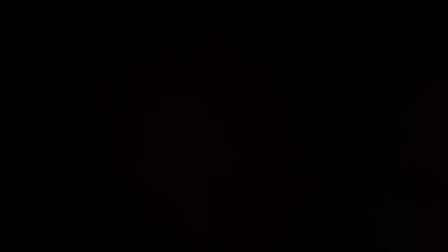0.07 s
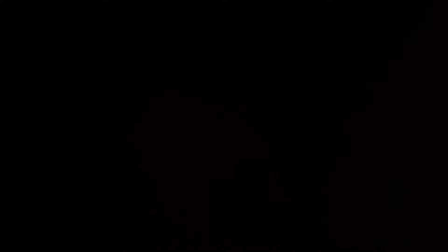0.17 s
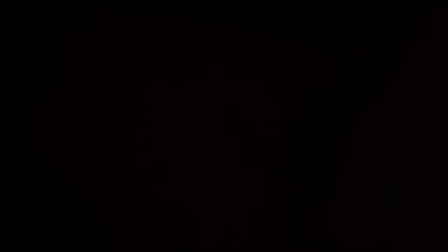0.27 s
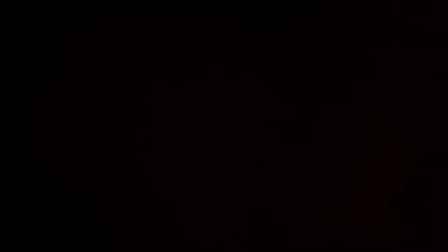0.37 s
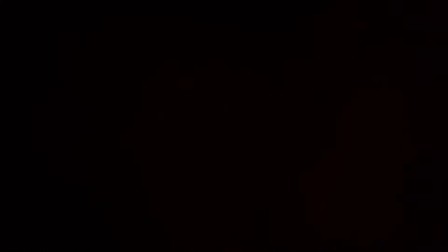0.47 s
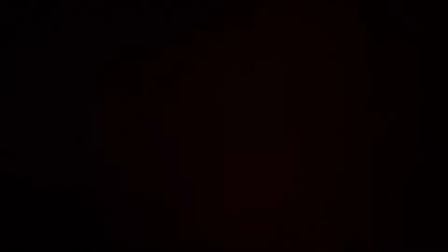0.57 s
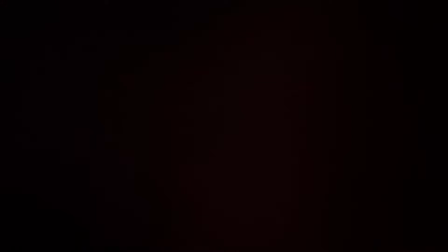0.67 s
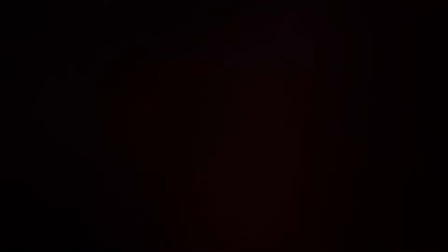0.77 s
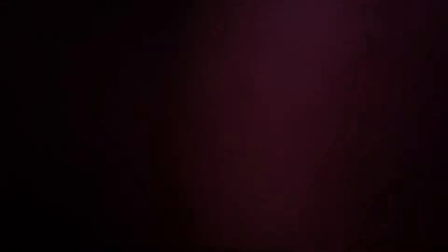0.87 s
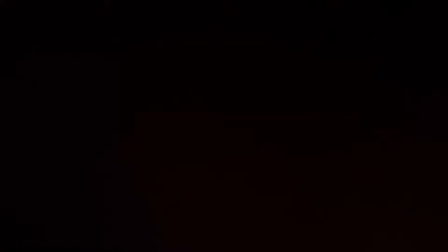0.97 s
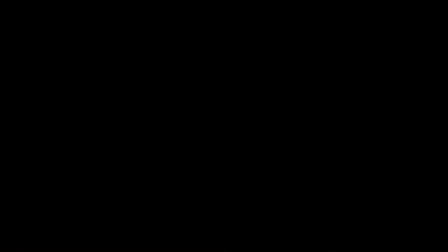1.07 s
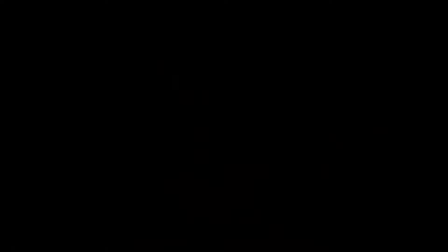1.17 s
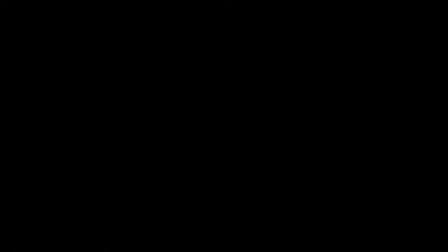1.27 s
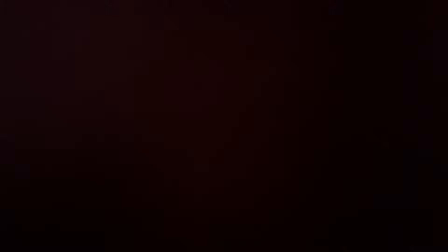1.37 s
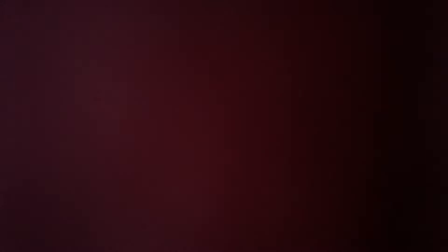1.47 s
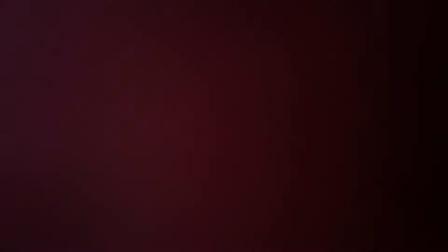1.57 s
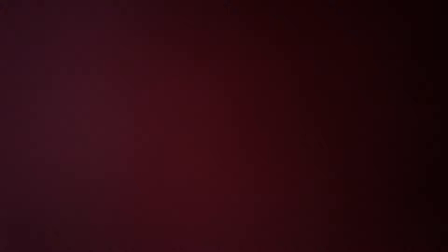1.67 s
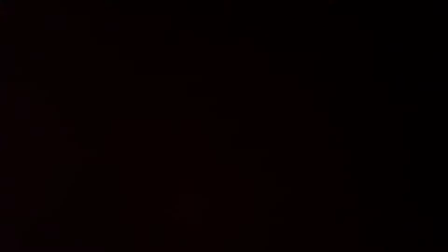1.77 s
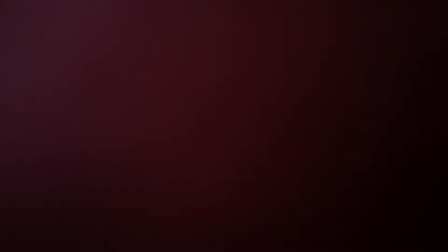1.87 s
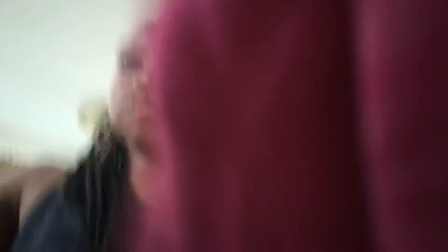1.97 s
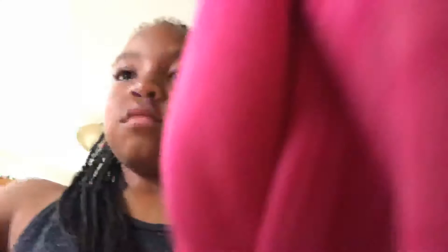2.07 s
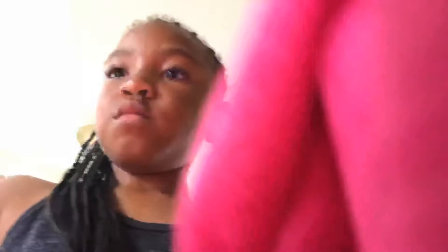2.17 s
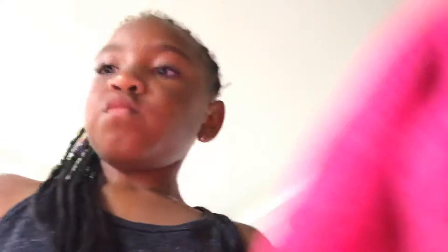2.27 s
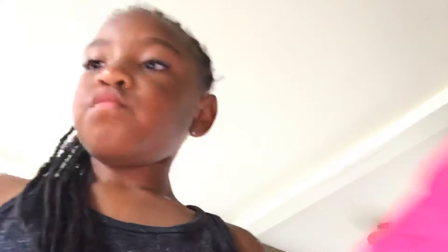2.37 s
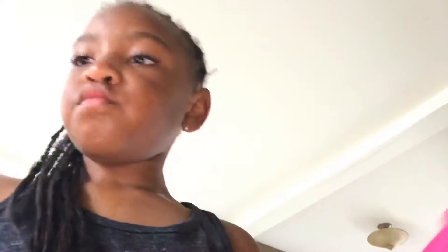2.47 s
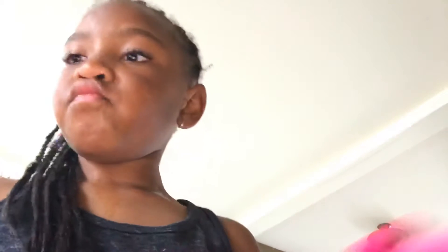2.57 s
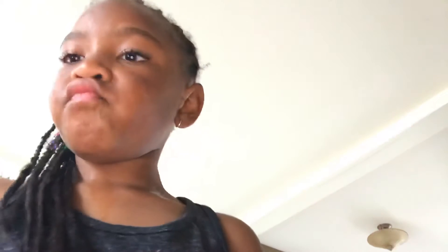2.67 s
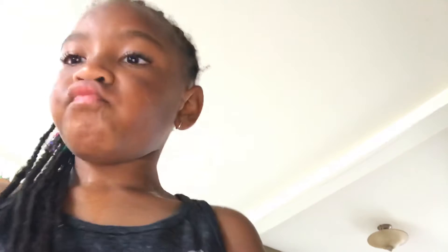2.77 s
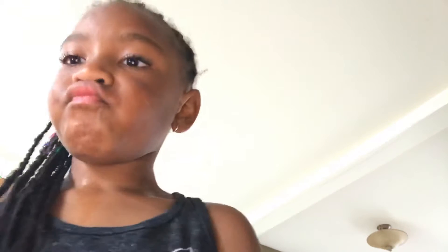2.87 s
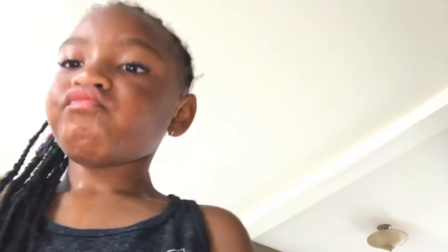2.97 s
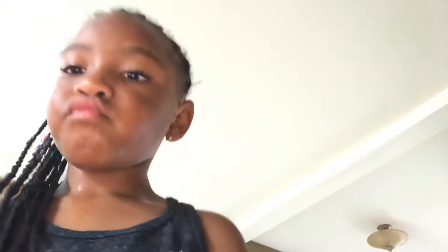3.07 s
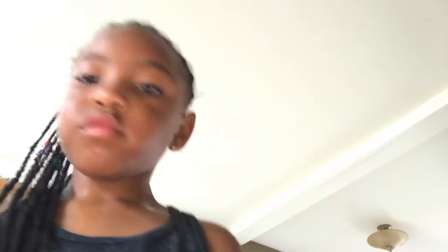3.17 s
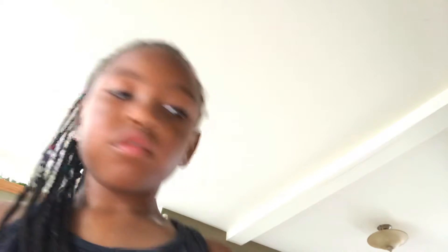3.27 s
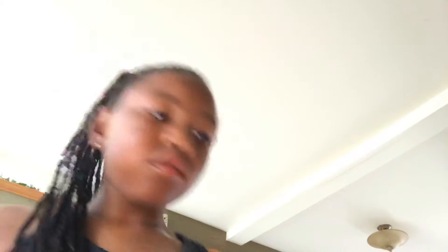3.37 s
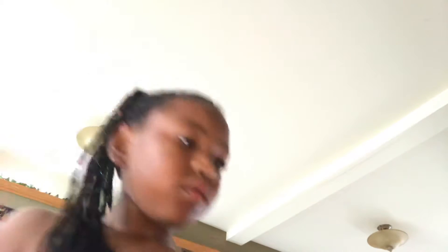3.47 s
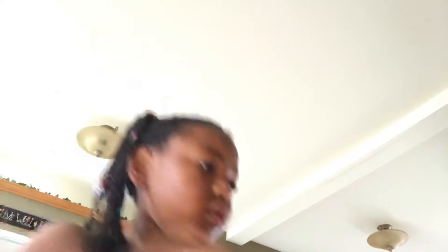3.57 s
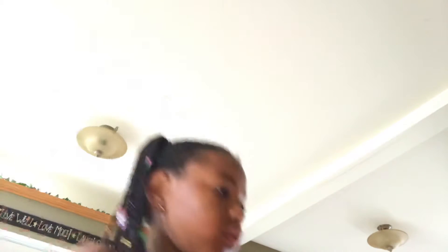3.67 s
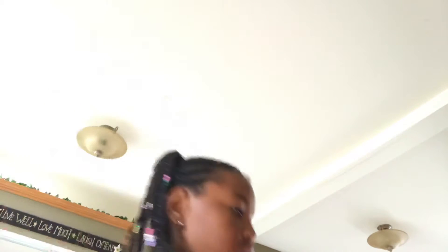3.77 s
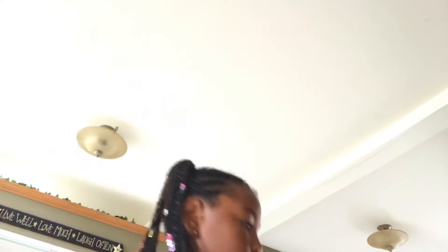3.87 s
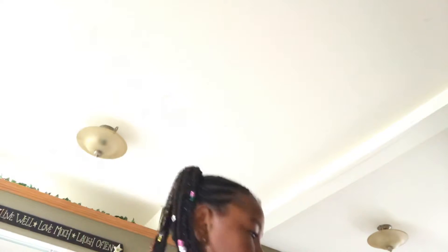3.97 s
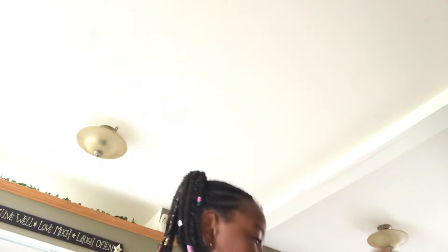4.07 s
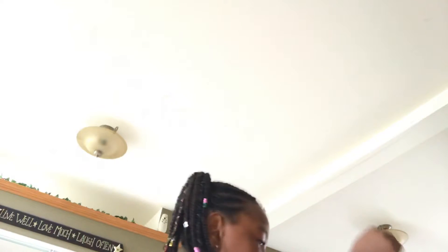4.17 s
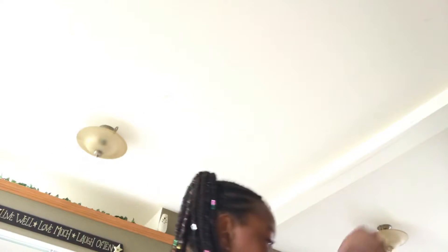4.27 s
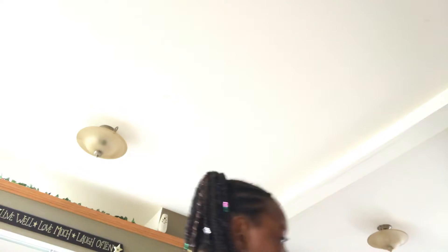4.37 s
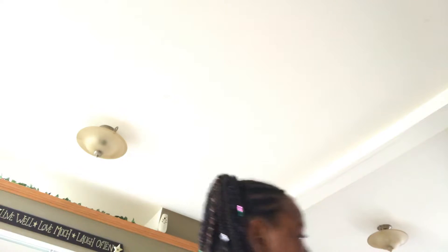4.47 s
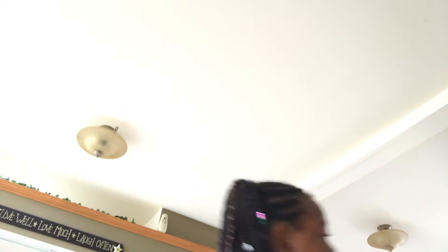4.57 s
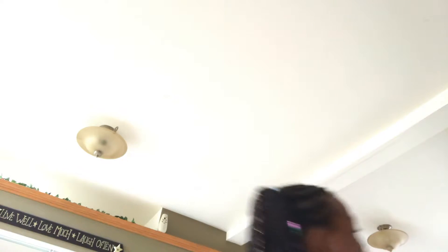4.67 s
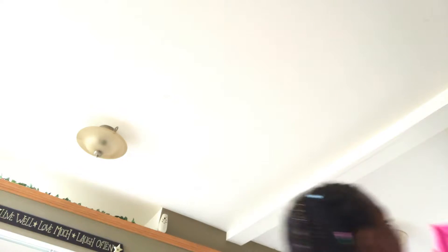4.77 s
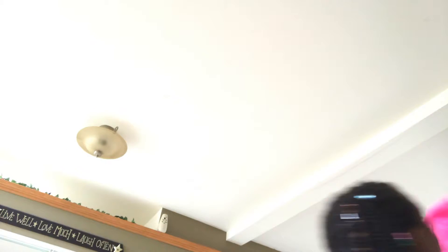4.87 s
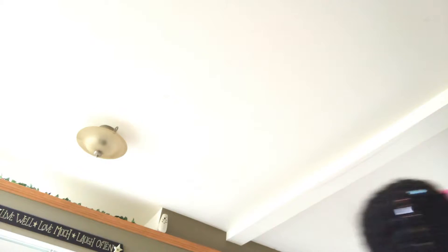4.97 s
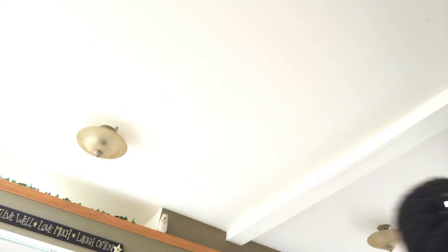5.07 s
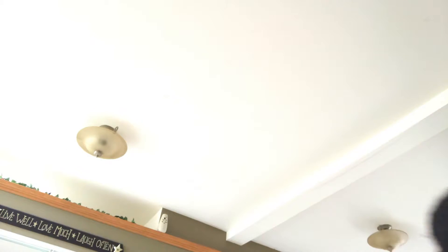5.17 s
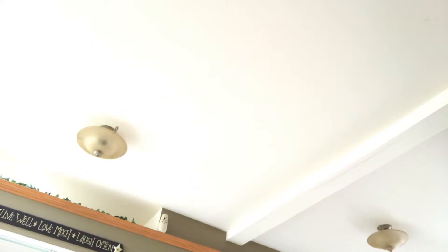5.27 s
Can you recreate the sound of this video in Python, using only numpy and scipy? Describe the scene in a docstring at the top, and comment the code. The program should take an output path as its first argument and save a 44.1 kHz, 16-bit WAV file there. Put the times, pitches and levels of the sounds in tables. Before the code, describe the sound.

A camera is handled indoors, heard very close and dry through its own microphone. Soft skin and cloth brushes open over a quiet room. At about 0.13 s a gritty finger wipe and bump strike, followed until 0.5 s by short, rough squeaks, the last sinking to a low groan. Hard, overloaded knocks cluster around 0.6 s. From 0.85 to 1.55 s thuds come thick and irregular over rumbling, hissing rubbing, with dry ticks and scrapes; the loudest fall near 1.07 and 1.16 s. Another heavy thump with scraping lands at 1.82 s, then lighter rubbing. At 2.3 s a bright clack and thud set the camera down, its support ringing briefly and woodenly. A sharp small tap at 2.5 s, faint scuffs, weak bumps around 3.0 s and a light tap with brushing near 3.4 s follow. A barely audible low bump comes at 3.8 s; then only a low, dull room hush remains until the end.

```python
"""Soft brushes of skin and cloth over a quiet room, then a small camera is gripped, shifted and set down indoors.
It is heard through its own microphone: rubbing is filtered trains of slips, squeaks are gliding stick-slip tones,
scrapes and scuffs are shaped friction noise. Bumps thud as decaying sines with noisy chatter and overload the
microphone, where a limiter rounds them off. The camera lands on a support whose modes ring briefly, a few last
brushes follow, and the quiet room remains."""
import sys
import numpy as np
from scipy import signal
from scipy.fft import rfft, irfft
from scipy.io import wavfile
from scipy.ndimage import uniform_filter1d, minimum_filter1d

SR = 44100
rng = np.random.default_rng(int(sys.argv[2]) if len(sys.argv) > 2 else 0)


def int16_out(signal):
    """Quantize to a 16-bit WAV file."""
    q = np.round(np.clip(np.atleast_2d(signal).T, -1, 1) * 32767)
    wavfile.write(sys.argv[1], SR, q.astype(np.int16))


N = 235254
TIME = np.arange(N) / SR  # seconds

# spectrum of a contact chattering through the case: pitch_hz [Hz], level_db [dB per Hz]
CHATTER_COLOUR = [(35, -26), (100, 11.5), (300, 9.5), (950, 1.5), (1400, -4), (1900, 1), (2500, -4.5),
                  (16000, -9)]
# spectrum of gritty skin friction: pitch_hz [Hz], level_db [dB per Hz]
GRIT_COLOUR = [(100, -29), (700, -9.5), (2200, -1), (3800, -4), (6500, -1.5), (7600, -4), (8800, -0.5),
               (11000, -12), (16000, -13.5)]


def amp(db):
    """Decibels to gain."""
    return 10 ** (np.asarray(db) / 20)


def unit(x):
    """Scales to rms 1."""
    return x / np.sqrt(np.mean(x ** 2) + 1e-20)


def held(x, length):
    """Scales a burst so that its energy equals rms 1 over its length in seconds."""
    return x / np.sqrt(np.sum(x ** 2) / (length * SR) + 1e-20)


def add(mix, s, sound):
    """Adds a sound into the mix at time s in seconds."""
    part = mix[max(round(s * SR), 0):][:len(sound)]
    part += sound[:len(part)]


def colour(x, points, size=4096):
    """Causal minimum-phase filter with the given spectrum."""
    hz, db = np.transpose(points)
    bin_hz = abs(np.fft.fftfreq(size, 1 / SR))
    log_gain = np.log(amp(np.interp(np.log(bin_hz + 1), np.log(hz), db)))
    response = np.fft.ifft(np.exp(np.conj(signal.hilbert(log_gain)))).real
    return signal.fftconvolve(x, response[:size // 2])[:len(x)]


def lowpass(x, hz):
    """Two-pole low-pass: a soft contact passes little treble."""
    return signal.sosfilt(signal.butter(2, min(hz, SR / 3), fs=SR, output="sos"), x)


def band(x, low_hz, high_hz):
    """Band-pass with two-pole edges on both sides."""
    return signal.sosfilt(signal.butter(2, [low_hz, high_hz], "bandpass", fs=SR, output="sos"), x)


def resonate(x, hz, width):
    """One resonance of gain 1, fixed or following a pitch curve; pitch and width in Hz."""
    turn = np.exp(2j * np.pi * np.cumsum(hz * np.ones(len(x))) / SR)
    r = np.exp(-np.pi * width / SR)
    shifted = signal.lfilter([1 - r], [1, -r], x / turn)  # the resonance moved down to 0 Hz
    return 2 * (turn * shifted).real


def drift(rate_hz):
    """Slow random wander of rms 1."""
    keep = np.exp(-(np.fft.rfftfreq(N, 1 / SR) / rate_hz) ** 2)
    return unit(irfft(rfft(rng.standard_normal(N)) * keep, N))


def slips(per_s, spread_db):
    """Random train of tiny stick-slip impulses of uneven size."""
    size = amp(spread_db * np.minimum(rng.exponential(1, N), 3))
    return size * rng.choice([-1, 1], N) * (rng.random(N) < per_s / SR)


def contact(t, length, rise, release):
    """Pressure of a contact: lands hard, holds, lets go; all times in seconds."""
    landed = (1 - np.exp(-t / rise)) * (1 + np.exp(-t / (10 * rise)))
    return landed * np.exp(-np.maximum(t - length, 0) / release)


def port(x):
    """Ring of the small cavity in front of the microphone and of the case, as parallel resonances."""
    # resonances of cavity and case: pitch_hz [Hz], width_hz [Hz], level_db [dB]
    modes = [(6070, 150, 5), (2340, 400, -9), (8460, 260, -11)]
    return sum(amp(db) * resonate(x, hz, width) for hz, width, db in modes)


def swell(peak, width):
    """Smooth rise and fall of one brush, times in seconds."""
    return np.exp(2 - 2 * np.sqrt(1 + ((TIME - peak) / width) ** 2))


def grip(fade=.015):
    """Gains of pressure and hiss over time: the camera slides through the grip, plus single brushes."""
    # course of the long slide: time_s [s], pressure_db [dB], hiss_db [dB]
    slide_points = [(0.385, -42, -64), (0.46, -34, -61), (0.545, -32.5, -49.5), (0.68, -29, -66),
                    (0.77, -32, -51.5), (0.849, -32, -44), (0.94, -32, -60), (1.11, -21.5, -48),
                    (1.26, -23, -46.5), (1.31, -32, -56.5), (1.41, -25.5, -54.5), (1.48, -37, -60),
                    (1.7, -43, -52), (1.79, -48.5, -62), (1.89, -32, -64.5), (2.02, -42, -60),
                    (2.28, -44, -51.5), (2.47, -45, -63)]
    # single brushes: peak_s [s], width_s [s], pressure_db [dB], hiss_db [dB]
    brush_table = [(.0, .03, -42, -62), (.06, .017, -47, -53), (.215, .04, -34, -43),
                   (.325, .013, -36.5, -40.5), (2.1, .018, -41, -60), (2.668, .028, -40, -72),
                   (3.069, .055, -47, -53), (3.385, .05, -57, -54), (3.43, .014, -48, -44.5)]
    s, pressure_db, hiss_db = np.transpose(slide_points)
    touching = np.exp(-abs(TIME - np.clip(TIME, s[0], s[-1])) / fade)
    gains = touching * amp([np.interp(TIME, s, pressure_db), np.interp(TIME, s, hiss_db)])
    return gains + sum(np.outer(amp(levels), swell(peak, width)) for peak, width, *levels in brush_table)


def rubbing(judder_db=3.0, judder_hz=50, hiss_judder_db=2.4, peak_width_hz=1400, peak_db=-4, port_db=-15,
            snag_db=-8, rasp_db=-2, rasp_share=0.39, grit_db=-12.5, grit_share=.7,
            crackle_db=-17, crackles_per_s=60, crackle_hz=1500):
    """Skin and cloth slide on the case: coarse slips rumble, finer ones rasp and hiss, a few catch and crackle."""
    # spectrum of fine sliding: pitch_hz [Hz], level_db [dB per Hz]
    hiss_colour = [(900, -12), (2600, 0), (4200, -4), (6100, -3.5), (9500, -2.5), (12000, -10.5),
                   (16000, -24)]
    # the grip loosens, so the gap under the hand sings higher; rasp, grit and crackle get a boost that is
    # strongest early, drops, returns briefly near 1.7 s, then fades: time_s [s], gap_hz [Hz], bite_db [dB]
    gap_points = [(.85, 6850, 4), (1.3, 8000, -4.5), (1.68, 9000, 1.5), (2.2, 9500, -7)]
    pressure, hiss_gain = grip()
    s, gap_hz, bite_db = np.transpose(gap_points)
    judder = drift(judder_hz)  # uneven finger pressure
    judder_gain, hiss_judder_gain = amp(judder_db * judder), amp(hiss_judder_db * judder)

    rumble = unit(band(colour(slips(900, 3), CHATTER_COLOUR), 38, 310)) * judder_gain
    rasp = unit(band(colour(slips(3000, 4), CHATTER_COLOUR), 400, 1200)) * judder_gain
    grit = unit(band(slips(900, 5), 1100, 3000)) * hiss_judder_gain
    crackle = unit(band(colour(slips(crackles_per_s, 2.5), CHATTER_COLOUR), 250, crackle_hz))

    drag = rng.standard_normal(N) + amp(snag_db) * unit(slips(65, 6))  # now and then a fibre snags
    fibres = (unit(colour(drag, hiss_colour)) + amp(port_db) * unit(port(drag))) * hiss_judder_gain
    singing_gap = unit(resonate(fibres, np.interp(TIME, s, gap_hz), peak_width_hz))
    hiss = unit(fibres + amp(peak_db) * singing_gap)

    lightness = hiss_gain / (pressure + 1e-12)  # the finer a layer, the more it follows the hiss
    middle = amp(rasp_db) * lightness ** rasp_share * rasp
    middle = middle + amp(grit_db) * lightness ** grit_share * grit
    bite = amp(np.interp(TIME, s, bite_db))
    return pressure * (rumble + bite * (amp(crackle_db) * crackle + middle)) + hiss_gain * hiss


def room(x, wet_db=-30, dull_hz=700, hush_db=-58, stir_db=7, count=24000):
    """A faint, dull echo and the hush of the room, livelier while someone moves close by."""
    # spectrum of the hush: pitch_hz [Hz], level_db [dB per Hz]
    hush_colour = [(20, -20.5), (60, -1.5), (125, -4.5), (200, -8.5), (340, -10), (450, -22.5),
                   (650, -22.5), (1200, -34.5), (4000, -38), (16000, -42)]
    decay = np.exp(-np.log(1000) * TIME[:count] / .5)  # falls 60 dB in half a second
    echo = signal.fftconvolve(x, lowpass(rng.standard_normal(count), dull_hz) * decay)[:N]
    hush = unit(colour(rng.standard_normal(N), hush_colour))
    hush_gain = amp(hush_db + np.interp(TIME, [3.3, 4.4], [stir_db, 0]))  # settles to hush_db
    return amp(wet_db) * np.std(x) * unit(echo) + hush_gain * hush


def wipe(top_hz=7500):
    """A finger wipes across the port: friction swells, makes the cavity sing and stops short."""
    # the one wipe: peak_s [s], rise_s [s], fall_s [s], grit_db [dB], ring_db [dB]
    wipe_settings = (.1345, .0035, .0015, -19.5, -6.5)
    s, rise, fall, grit_db, ring_db = wipe_settings
    noise = lowpass(rng.standard_normal(N), top_hz)
    level = np.exp(-abs(TIME - s) / np.where(TIME < s, rise, fall))
    return level * (amp(grit_db) * unit(colour(noise, GRIT_COLOUR)) + amp(ring_db) * unit(port(noise)))


def scrapes(rise=0.00043, release=.0006, release_share=0.18, grain=0.48, ring_db=-11, count=6144):
    """Gritty slips of skin over the case: short noise bursts that also ring the microphone cavity."""
    # slips: start_s [s], level_db [dB], length_s [s]
    scrape_table = [(.135, -30, .017), (0.6018, -26.5, 0.0013), (.609, -18.5, 0.00092),
                    (.685, -41, 0.00094), (1.009, -34.5, 0.0053), (1.073, -32, .003), (1.155, -22.5, .003),
                    (1.164, -29, .005), (1.251, -35, .002), (1.278, -26, 0.002), (1.381, -37, 0.011),
                    (1.821, -32, .025), (2.2995, -14, 0.0026), (2.304, -30.5, 0.028), (2.36, -42, .004),
                    (2.505, -21, 0.00042), (3.034, -43.5, .027)]
    out, t = np.zeros(N), TIME[:count]
    for s, db, length in scrape_table:
        noise, lumps = rng.standard_normal((2, count))
        force = noise * np.exp(grain * unit(uniform_filter1d(lumps, size=60)))
        force = force * contact(t, length, rise, release + release_share * length)
        skin = held(colour(force, GRIT_COLOUR), length)
        ring = amp(ring_db) * held(port(force), length)
        add(out, s, amp(db) * (skin + ring))
    return out


def bumps(cycles=1.02, sag=0.073, rise=.001, release=0.0078, crackle=.22,
          chatter_hz=1900, brighter_db_per_octave=8.5, count=8192):
    """Each bump swings the case for a few cycles while the contact chatters, louder and brighter if hard."""
    # bumps on the case: start_s [s], strength_db [dB], thud_hz [Hz],
    # hardness_db [dB, chatter against thud], contact_s [s]
    bump_table = [(.137, -13, 260, -10, .012), (0.148, -.5, 195, -27, 0.0095),
                  (.195, -10.5, 200, -16, 0.0074), (.567, -14.5, 150, -20, .036),
                  (.603, -1, 450, -14, .013), (.609, -4, 200, -5, 0.0052), (.619, -1, 120, -16, .007),
                  (0.6312, 1, 115, -9, .004), (0.659, -9, 130, -25, 0.017), (.869, -8, 160, -15.5, 0.023),
                  (0.9, -6, 210, -23, .03), (1.004, -6, 330, -9.5, 0.008), (1.017, -1.5, 150, -20, 0.018),
                  (1.058, -2.5, 190, -11, .025), (1.073, 3, 170, -16, .022), (1.157, 1.5, 195, -15.5, .014),
                  (1.181, -2, 290, -10.5, 0.011), (1.208, -13.5, 330, -7.5, 0.018),
                  (1.25, -6, 180, -19, 0.029), (1.35, -11, 230, -11.5, .006), (1.387, -7, 135, -13.5, .039),
                  (1.521, -8, 280, -9, .012), (1.824, 3.5, 160, -10.5, .016), (1.848, -20, 200, -8, .06),
                  (1.973, -18, 270, -17, .005), (2.298, -1.5, 1050, 2, .004), (2.304, -2, 400, -10, .008),
                  (2.311, -3, 115, -7, .019), (2.345, -24, 320, -5, .03), (2.504, -10, 265, -7.5, .001),
                  (2.954, -27.5, 80, -17, 0.021), (3.031, -27, 270, -13, .04), (3.05, -22, 280, -12, 0.022),
                  (3.4, -32, 250, -5.5, .01), (3.771, -35, 90, -17, .075)]
    out, t = np.zeros(N), TIME[:count]
    for s, db, hz, hardness_db, length in bump_table:
        turns = hz * t * (1 - sag * (1 - np.exp(-t * hz / 2)))  # the pitch sags as the pressure eases
        thud = np.sin(2 * np.pi * turns) * np.exp(-hz * t / cycles) * (1 - np.exp(-t / rise))
        let_go = min(release, 2 * length)  # a brief tap also ends quickly
        noise, lumps = rng.standard_normal((2, count))
        force = noise * np.exp(crackle * unit(uniform_filter1d(lumps, size=100)))
        force = force * contact(t, length, rise, let_go)
        bright_hz = chatter_hz * 2 ** (hardness_db / brighter_db_per_octave)
        chatter = held(lowpass(colour(force, CHATTER_COLOUR), bright_hz), length + let_go / 2)
        add(out, s, amp(db) * (thud / abs(thud).max() + amp(hardness_db) * chatter))
    return out


def squeaks(jitter=0.022, overtone_slope=1.15, flutter_db=2.6, rasp_db=-16, count=9):
    """Regular stick-slip of a fingertip: unsteady gliding tones through the case, a puff of grit at each slip."""
    # one list a stroke: time_s [s], pitch_hz [Hz], level_db [dB]
    strokes = [
        [(.155, 636, -33), (.178, 721, -32.5), (.205, 740, -32)],
        [(.207, 988, -33), (.232, 1016, -32)],
        [(.298, 402, -36), (.316, 716, -32.5), (.334, 855, -31), (.352, 516, -37)],
        [(.406, 265, -30), (.432, 222, -23), (.525, 164, -27.5)],
    ]
    out, wobble, flutter = np.zeros(N), drift(220), drift(120)
    for stroke in strokes:
        s, hz, db = np.transpose(stroke)
        t = np.arange(s[0], s[-1], 1 / SR)
        pitch = np.interp(t, s, hz) * (1 + jitter * wobble[:len(t)])
        phase = 2 * np.pi * np.cumsum(pitch) / SR
        overtones = sum(np.sin(k * phase) / k ** overtone_slope for k in range(1, count))
        tone = colour(overtones, CHATTER_COLOUR)
        puffs = colour(rng.standard_normal(len(t)) * (1 + np.cos(phase)) ** 2, GRIT_COLOUR)
        speed = pitch / 1000  # the higher the squeak, the stronger its puffs
        level = amp(np.interp(t, s, db) + flutter_db * flutter[:len(t)])
        squeak = unit(tone) + amp(rasp_db) * speed * unit(puffs)
        add(out, s[0], squeak * level * signal.windows.tukey(len(t), .2))
    return out


def ticks():
    """Thin, dry ticks: single sharp impulses with no ring."""
    # ticks: start_s [s], peak_db [dB]
    tick_table = [(.6278, -8), (.8948, -16), (1.0283, -9), (1.0951, -8), (1.1952, -12), (1.3955, -13),
                  (1.529, -18), (1.8293, -8), (1.8961, -15.5), (2.3215, -10), (2.33, -11)]
    out = np.zeros(N)
    for s, db in tick_table:
        add(out, s, amp([db]))
    return out


def catches(fall=.003, count=2048):
    """Skin catches on an edge and lets go: a short dry crackle in the case."""
    # catches: start_s [s], peak_db [dB]
    catch_table = [(.685, -24), (.829, -24)]
    out = np.zeros(N)
    for s, db in catch_table:
        force = rng.standard_normal(count) * np.exp(-TIME[:count] / fall)
        crackle = band(colour(force, CHATTER_COLOUR), 450, 2200)
        add(out, s, amp(db) * crackle / abs(crackle).max())
    return out


def landing(rise=0.0054, rock_db=3):
    """The support rings on after each knock; each mode flutters as the case rocks on it."""
    # modes of the support, lowest first: pitch_hz [Hz], level_db [dB], t60_s [s]
    support_modes = [(309, -10, .19), (587, -21.5, 0.21), (943, -25, 0.15), (1254, -32, 0.08),
                     (1780, -29, 0.12)]
    # knocks that set it ringing: start_s [s], strength_db [dB], lowest_mode_extra_db [dB]
    knocks = [(2.313, 0, 0), (3.402, -16, -16)]
    out = np.zeros(N)
    for s, strength_db, lowest_db in knocks:
        t = np.maximum(TIME - s, 0)
        rings = []
        for hz, db, t60 in support_modes:
            level = amp(db - 60 * t / t60 + rock_db * drift(hz / 10))
            rings.append(level * np.sin(2 * np.pi * hz * t))
        ringing = amp(lowest_db) * rings[0] + sum(rings[1:])
        out += amp(strength_db) * (1 - np.exp(-t / rise)) * ringing
    return out


def scuffs(width_hz=560, overtone_slope=1.3, grain_db=2, count=16):
    """A finger drags lightly: grainy friction, half way to a squeak, with gliding peaks at odd multiples."""
    # scuffs: start_s [s], length_s [s], from_hz [Hz], to_hz [Hz], level_db [dB]
    scuff_table = [(2.373, .024, 590, 620, -34), (2.542, .02, 700, 680, -48), (2.591, .08, 800, 540, -50),
                   (3.35, .035, 680, 600, -55)]
    out, grain = np.zeros(N), amp(grain_db * drift(150))
    for s, length, from_hz, to_hz, db in scuff_table:
        t = np.arange(0, length, 1 / SR)
        hz = from_hz + (to_hz - from_hz) * t / length
        noise = rng.standard_normal(len(t))
        peaks = np.zeros(len(t))
        for k in range(1, count, 2):
            peak = resonate(resonate(noise, k * hz, width_hz), k * hz, width_hz)
            peaks += peak / max(k - 2, 1) ** overtone_slope  # the two lowest get equal weight
        add(out, s, amp(db) * unit(peaks * grain[:len(t)]) * signal.windows.tukey(len(t), .5))
    return out


def scene():
    """Everything that touches the camera, in its room."""
    handling = rubbing() + wipe() + scrapes() + bumps() + squeaks() + ticks() + catches() + landing() + scuffs()
    return (handling + room(handling))[None]


def record(dry, bass_cut_hz=50, ceiling=.97, size=44, edge_hz=16400):
    """Bass cut, a fast limiter that rounds off the largest swings, then the band limit."""
    x = signal.sosfilt(signal.butter(4, bass_cut_hz, "highpass", fs=SR, output="sos"), dry)
    needed = ceiling / np.maximum(abs(x), ceiling)
    gain = uniform_filter1d(minimum_filter1d(needed, size), size)  # windows of about 1 ms
    treble_cut = signal.firwin(255, edge_hz, window=("kaiser", 9), fs=SR)
    return signal.oaconvolve(x * gain, treble_cut[None], "same")


dry = scene()
out = record(dry)
int16_out(out)
```